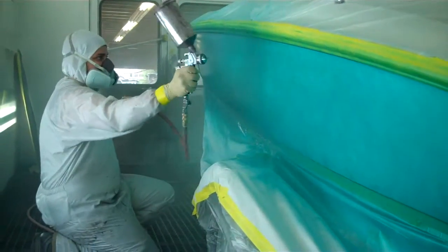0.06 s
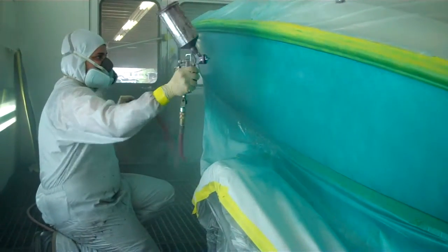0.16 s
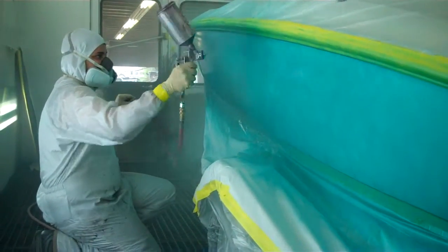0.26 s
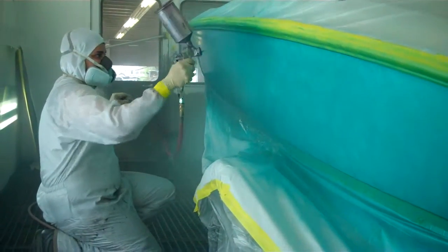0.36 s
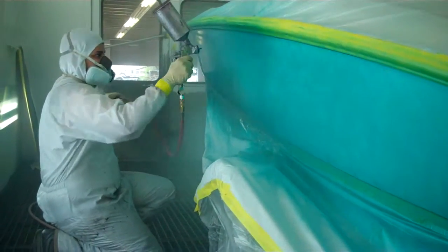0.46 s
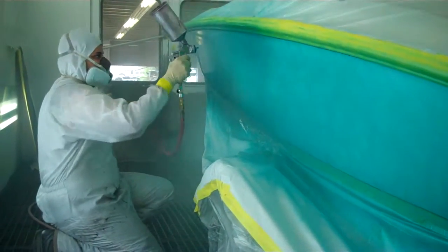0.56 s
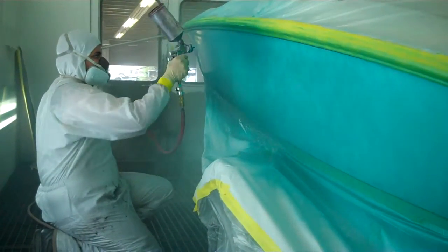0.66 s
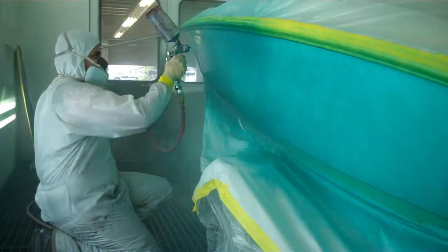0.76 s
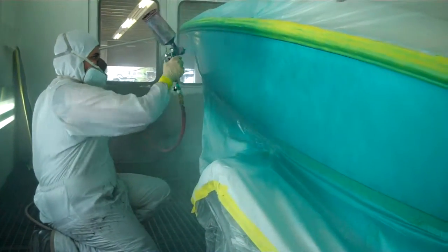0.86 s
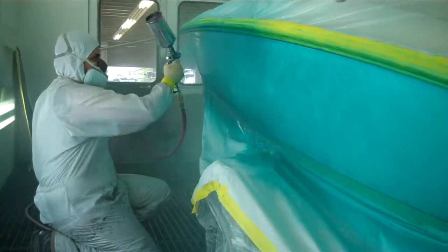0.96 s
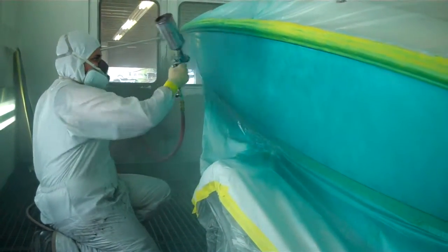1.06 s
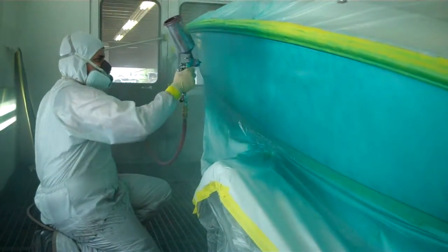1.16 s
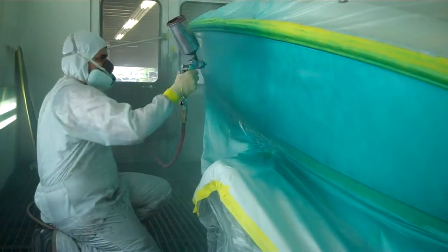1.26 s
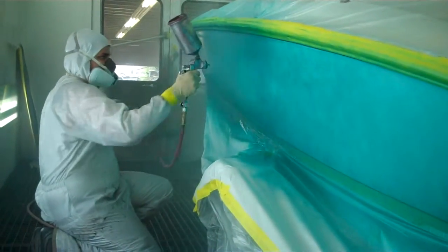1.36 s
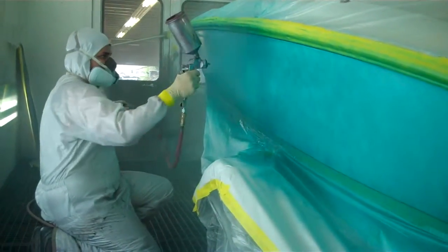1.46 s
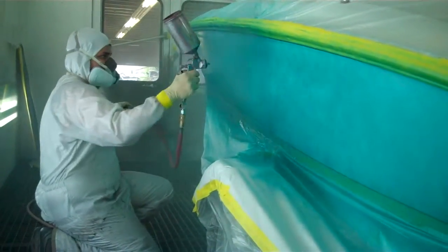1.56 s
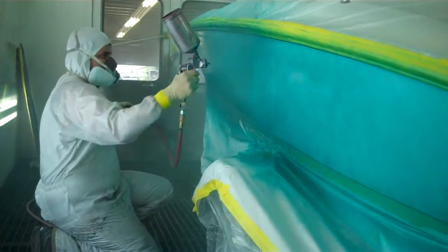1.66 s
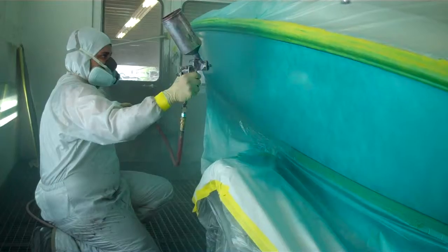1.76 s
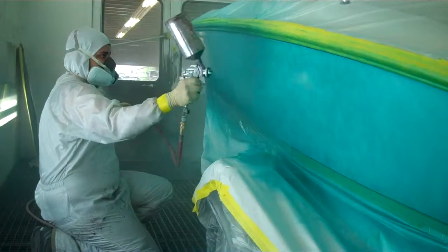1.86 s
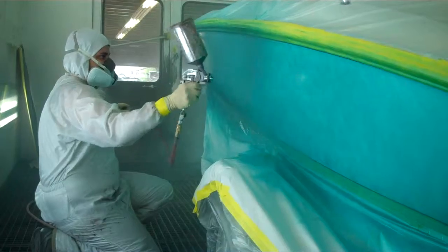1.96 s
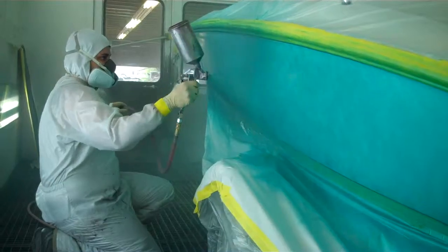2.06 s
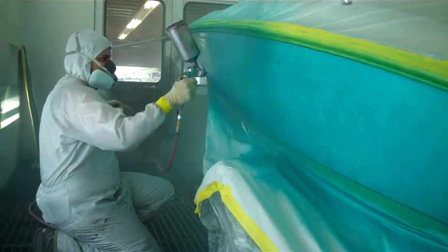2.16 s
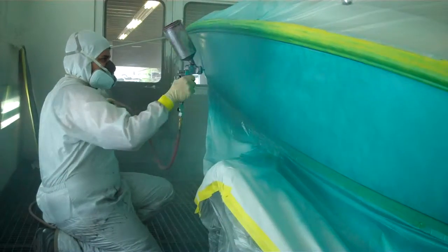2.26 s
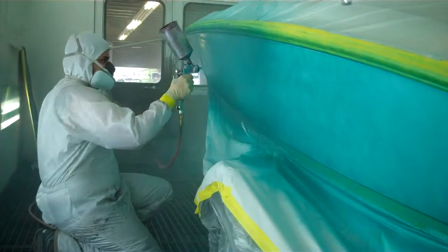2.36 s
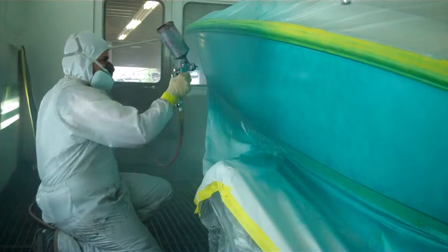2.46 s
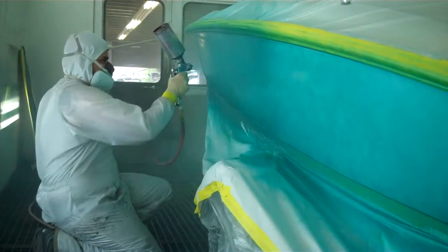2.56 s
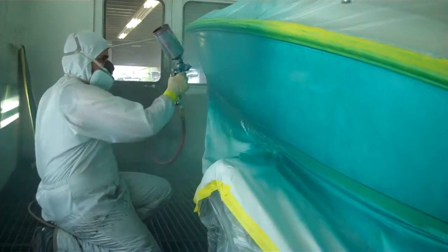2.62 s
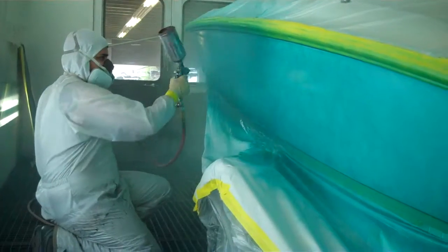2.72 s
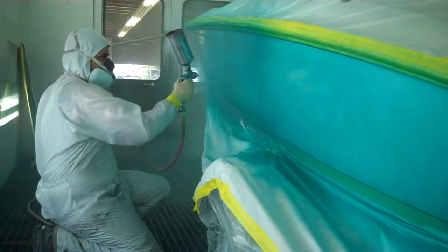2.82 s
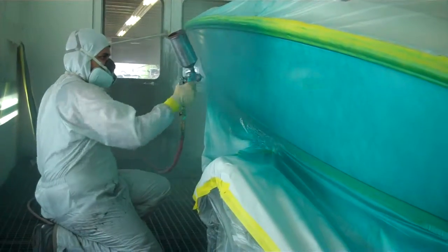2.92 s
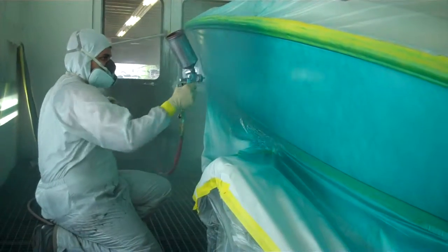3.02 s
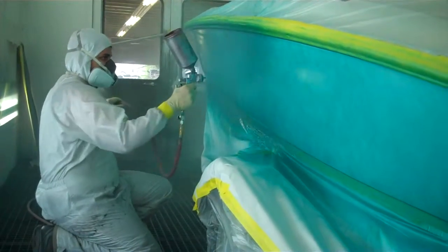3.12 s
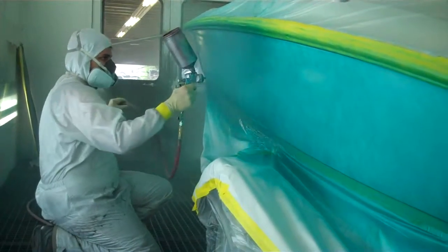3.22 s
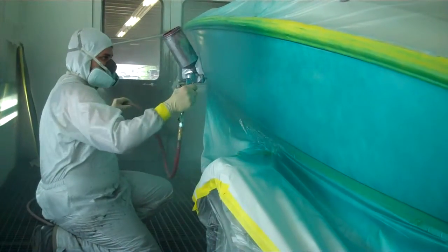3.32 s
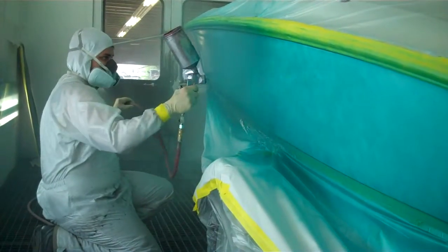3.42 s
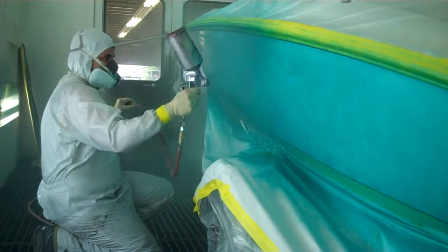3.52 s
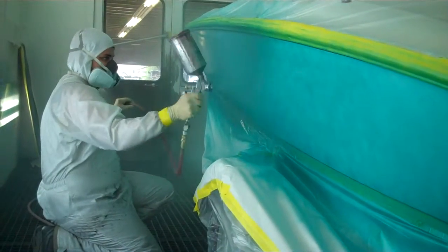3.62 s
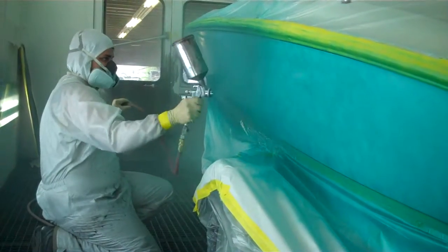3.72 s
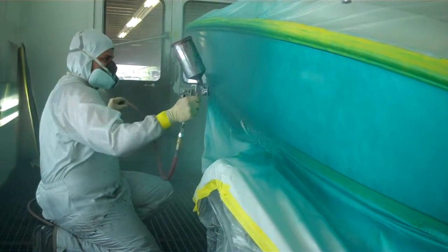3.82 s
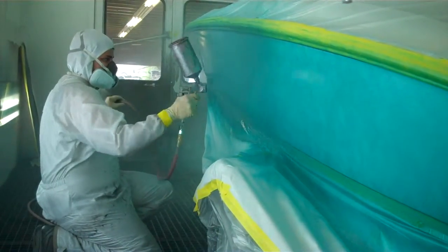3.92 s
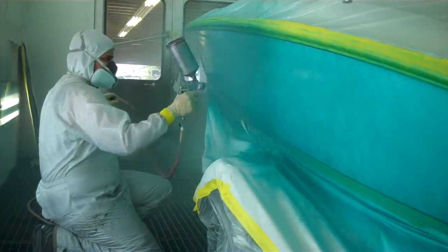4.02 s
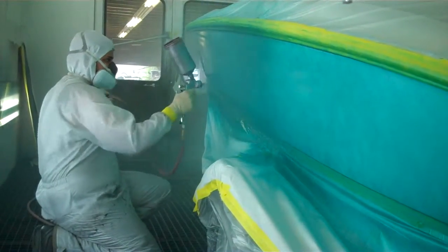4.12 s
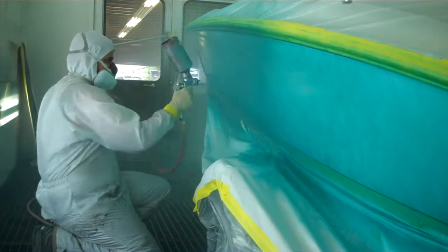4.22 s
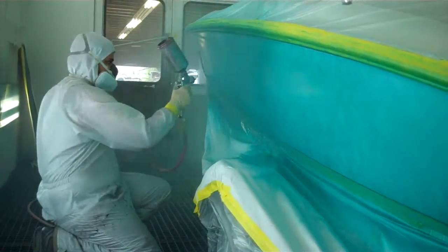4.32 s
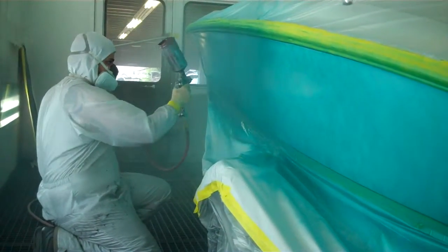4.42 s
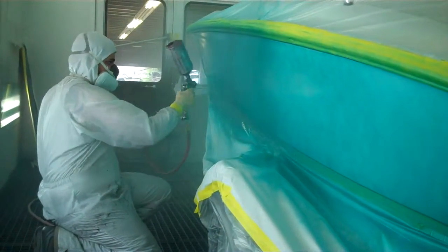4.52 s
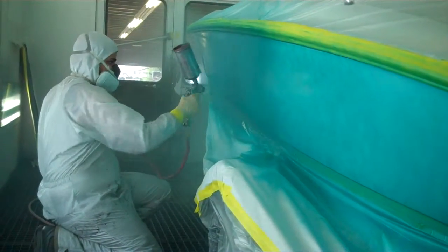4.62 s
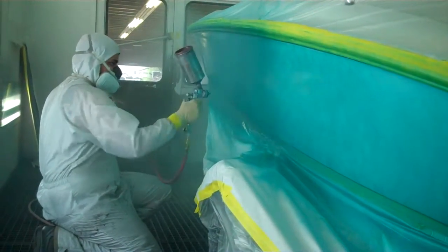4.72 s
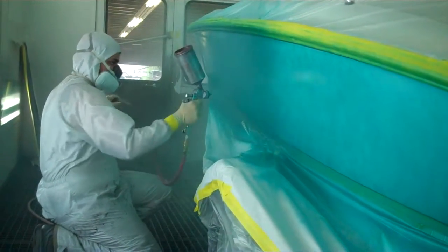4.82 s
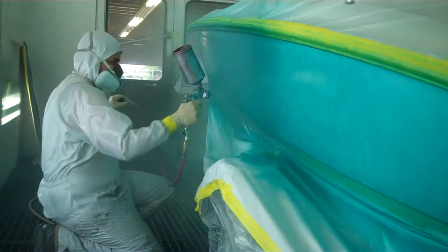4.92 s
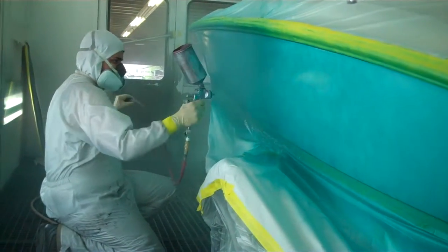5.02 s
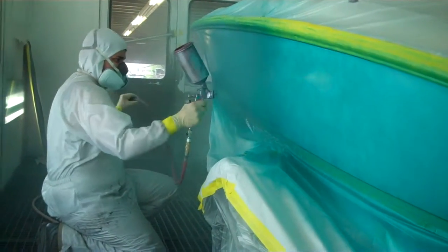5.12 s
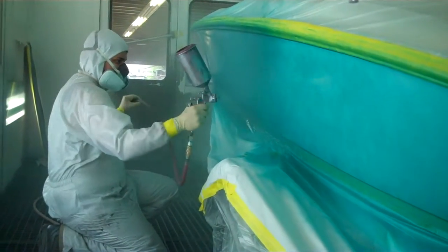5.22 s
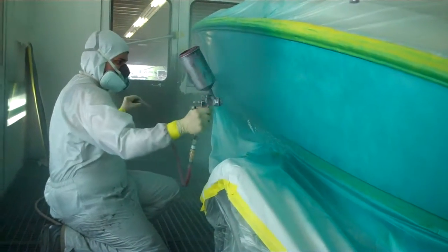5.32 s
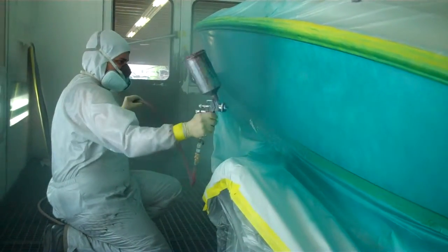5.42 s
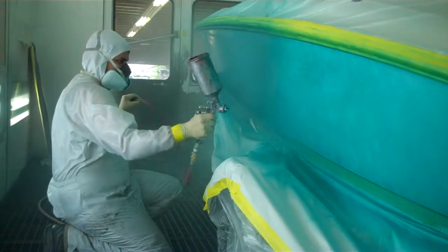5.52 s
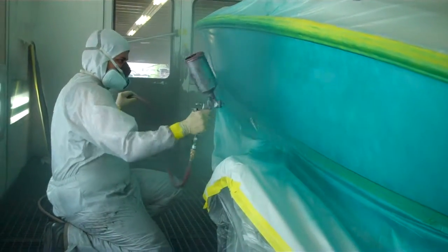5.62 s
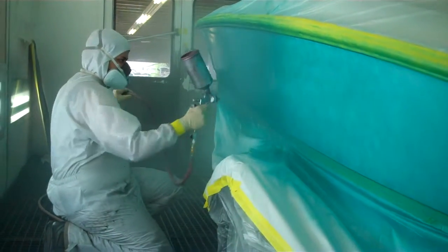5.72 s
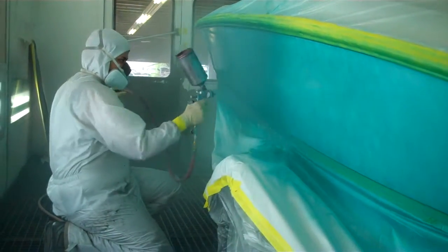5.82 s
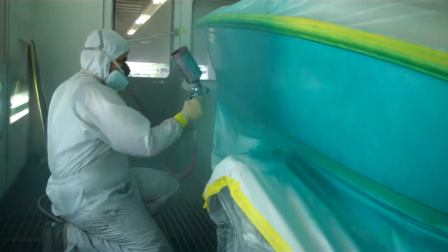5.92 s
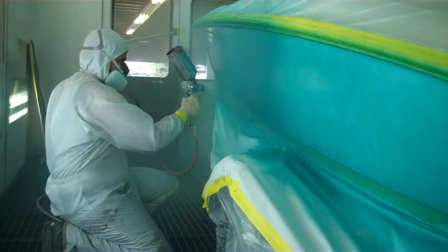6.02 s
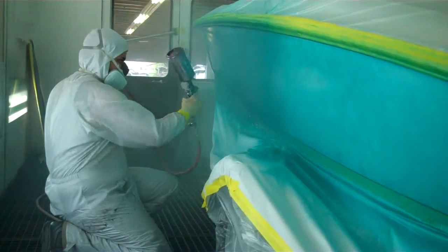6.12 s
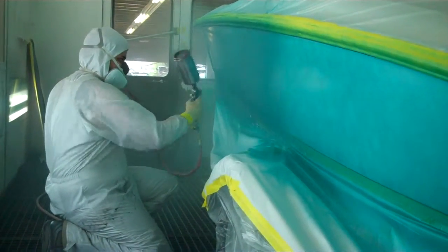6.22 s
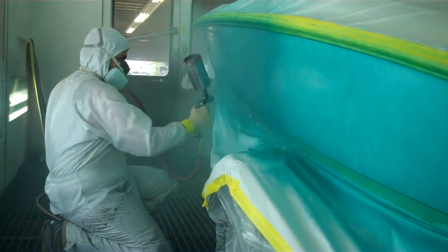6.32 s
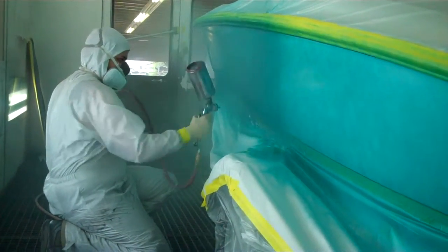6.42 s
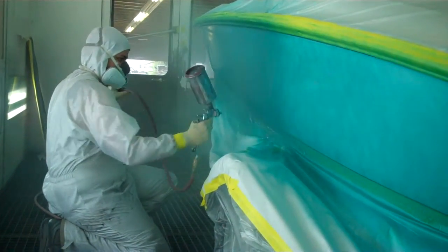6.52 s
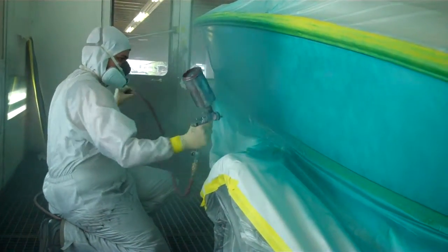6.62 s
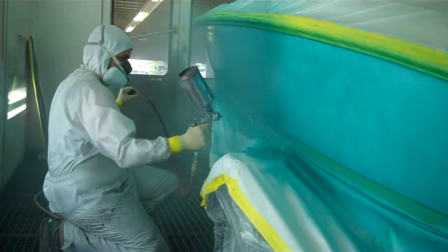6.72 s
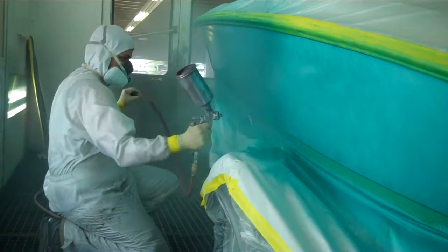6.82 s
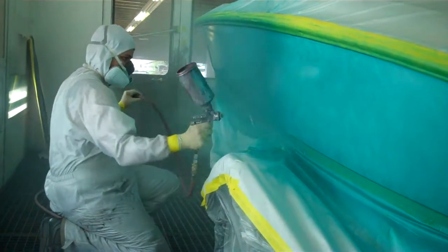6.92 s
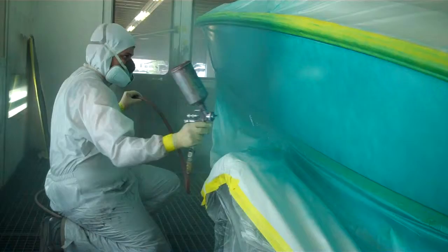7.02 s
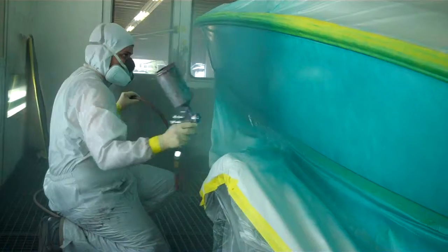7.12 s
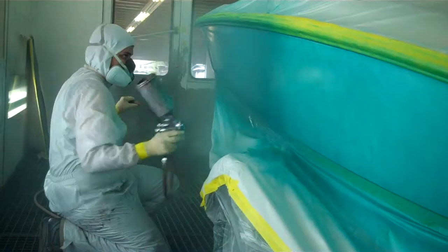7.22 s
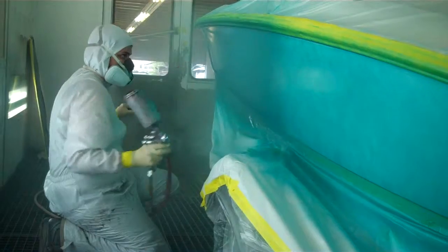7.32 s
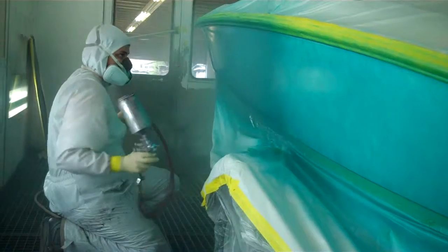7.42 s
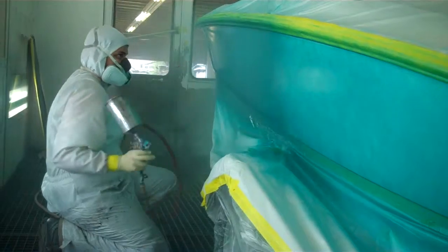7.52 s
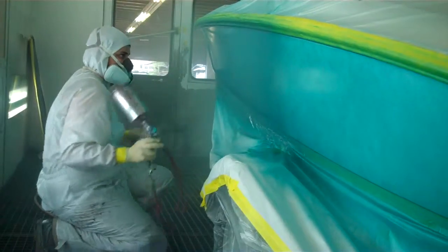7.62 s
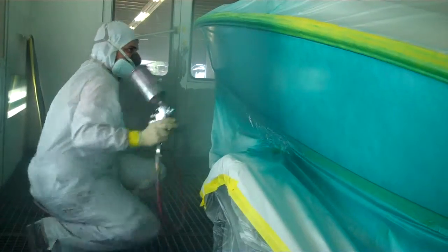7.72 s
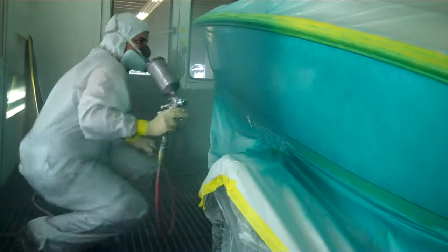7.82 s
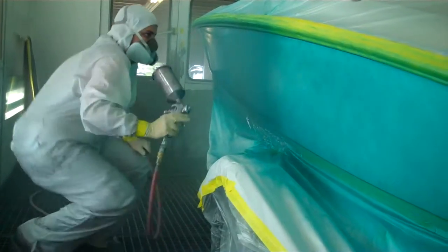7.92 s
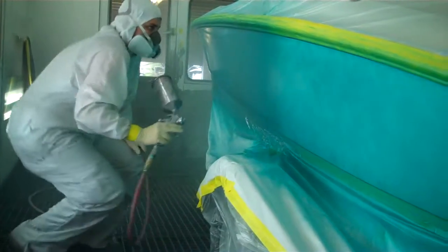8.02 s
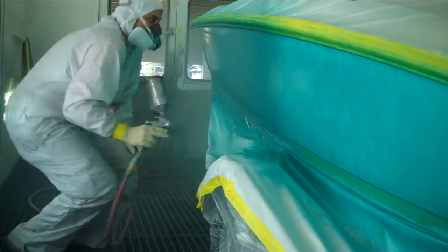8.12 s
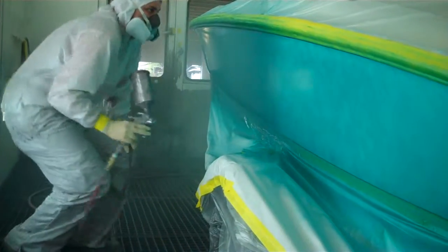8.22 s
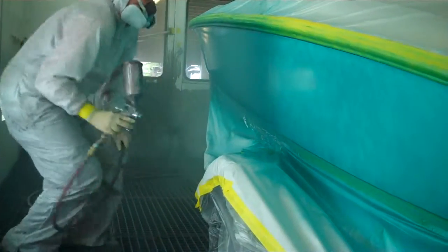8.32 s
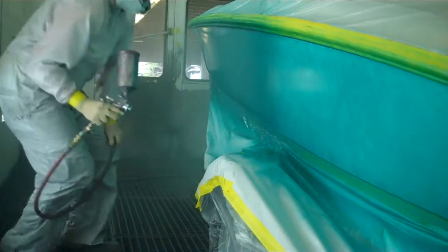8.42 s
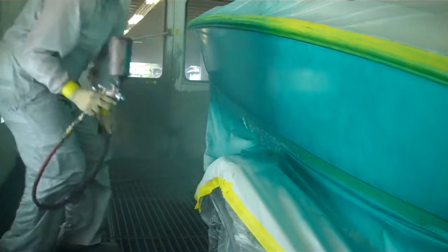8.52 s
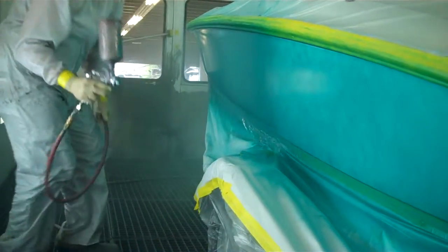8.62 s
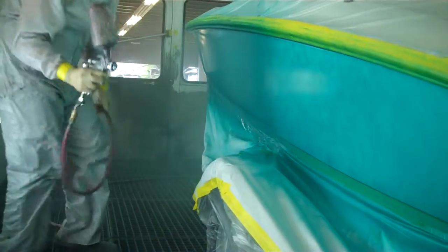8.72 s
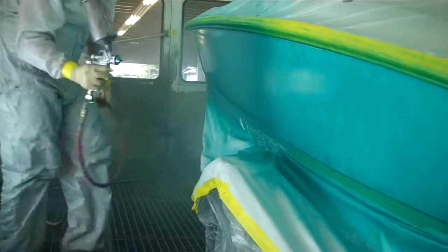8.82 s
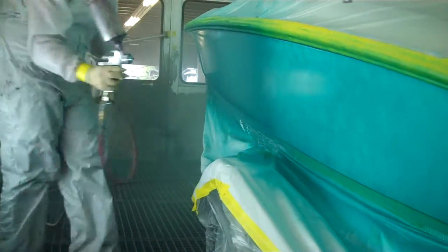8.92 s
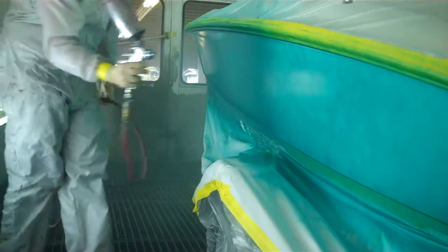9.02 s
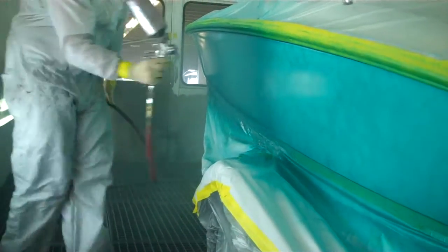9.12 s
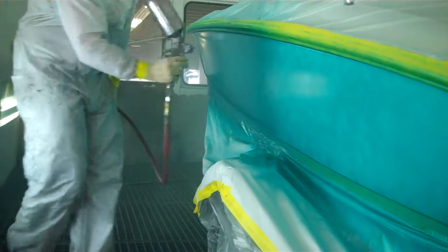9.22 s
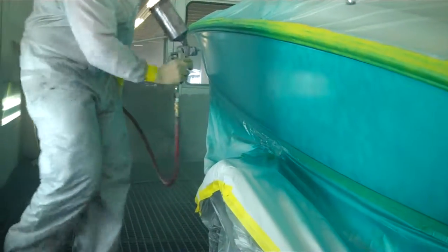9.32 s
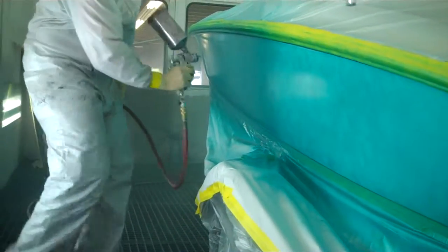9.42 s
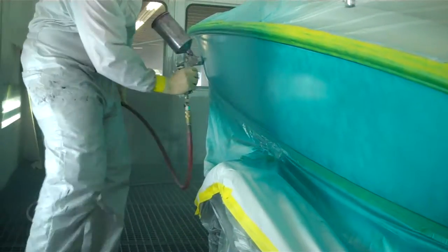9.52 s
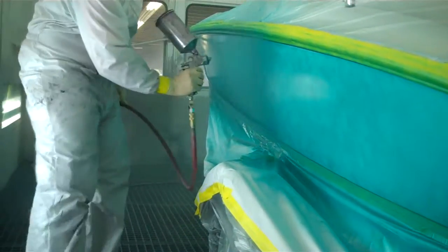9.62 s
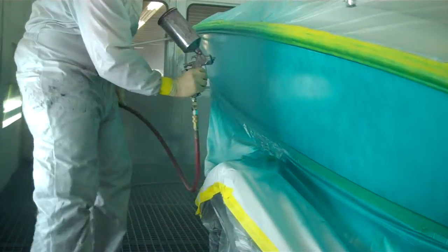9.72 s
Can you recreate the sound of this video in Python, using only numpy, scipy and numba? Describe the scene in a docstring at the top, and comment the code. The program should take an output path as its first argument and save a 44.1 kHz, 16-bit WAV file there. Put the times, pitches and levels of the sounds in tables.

```python
"""From the start a paint gun's turbulent jet hisses along a hull in a spray booth. Behind it extractor fans
hum in the ducts, air rushes through the filters and a belt chirrs once a turn. At 7.2 s the trigger is
released; the recorder's gain, a drawn curve, lifts the booth noise. At 8.8 s a fresh pull brings a surge
of stored air and the gain ducks that noise. Two close microphone ports, each with its own cavity ring,
hear it all. The right one crackles at both trigger moves, then pops until 9.3 s."""
import sys
import numpy as np
from scipy import signal
from scipy.fft import rfft, irfft
from scipy.io import wavfile
from scipy.ndimage import uniform_filter1d, map_coordinates
from numba import njit

SR = 44100
rng = np.random.default_rng(int(sys.argv[2]) if len(sys.argv) > 2 else 0)


def to_wav(s):
    """Save 16-bit WAV."""
    ch = np.atleast_2d(s).T  # columns
    pcm = np.round(np.clip(ch, -1, 1) * 32767)  # PCM
    wavfile.write(sys.argv[1], SR, pcm.astype(np.int16))


N = 430416
T, F = np.arange(N) / SR, np.arange(N // 2 + 1) * SR / N + 1e-3

# jet along the strokes: t/s, hiss level/dB, relative hull splash/dB
JET_LEVELS = [(0, -18.5, 2), (.35, -19, 1), (.75, -21, 3), (.95, -19.5, 3), (1.1, -19.5, 2.5),
              (1.43, -17.5, 2.5), (1.75, -18.5, 1.5), (2.05, -19.5, 1), (2.35, -21.5, 3.5),
              (2.62, -18.5, 1), (2.82, -20.5, 1.5), (2.98, -17.5, 3.5), (3.4, -17.5, 0), (3.75, -18, 1.5),
              (4.05, -20, 2.5), (4.4, -19.5, 3), (4.8, -17.5, 1.5), (5.07, -18, 2.5), (5.35, -18.5, 4),
              (5.61, -18.5, 0), (5.78, -21, 1), (6.05, -21, 2), (6.4, -19, 4.5), (6.8, -18, 3),
              (7.0, -18, 0), (8.94, -22.5, -2.5), (9.1, -22.5, 1), (9.32, -22.5, -5.5), (9.47, -19.5, -4.5),
              (9.62, -21.5, -2), (9.76, -19, 2.5)]
# jet noise: f/Hz, relative density/dB
JET_SPECTRUM = [(300, -37), (700, -17.5), (1500, -9), (2200, -6), (3000, -5), (4000, -1.5), (5000, -0.36),
                (6500, 2), (9000, 1.7), (12000, -1), (14200, -1.5)]
# gun nearing and leaving the hull: t/s, extra echo path/cm, echo gain/1
HULL_ECHO = [(0, 8, .1), (.2, 10, .12), (.55, 9, .2), (.9, 6.5, .1), (1.1, 7, .1), (1.38, 5.2, .33),
             (1.75, 8.8, .22), (2.05, 11, .1), (2.3, 8, .22), (2.62, 6.8, .24), (2.85, 7.3, .14),
             (3.1, 6.2, .22), (3.45, 8.8, .25), (3.85, 10.5, .22), (4.1, 8.5, .36), (4.4, 7, .3),
             (4.62, 7, .26), (4.85, 5.3, .36), (5.05, 6, .3), (5.3, 9, .3), (5.55, 10, .24),
             (5.75, 9.5, .1), (6, 7, .15), (6.25, 6.7, .12), (6.5, 6, .08), (7, 9, .25), (7.2, 10.5, .2),
             (8.9, 8.7, .12), (9.76, 9.8, .14)]
# crackle at trigger moves: t/s, length/s, level/dB
CRACKLE_BURSTS = [(7.203, .017, -1), (8.8334, .022, 2.5)]
# lone pops: t/s, level/dB
LONE_POPS = [(8.864, -3), (8.879, -7.5), (8.908, -18), (8.926, -12), (8.979, -16), (8.985, -15),
             (8.991, -15), (9.015, -14), (9.036, -10), (9.039, -9), (9.106, -9.5), (9.154, -15),
             (9.182, -8), (9.196, -9), (9.208, -10), (9.234, -8.5), (9.266, -14)]
# heard level of hum and rush; wavers while spraying, then recorder gain ducks and recovers
# around the trigger moves: t/s, hum gain/dB, rush gain/dB
HEARD_GAINS = [(0, -3.5, -9.5), (1.3, -2.5, -5), (2.4, -4.5, -7), (3.3, -1.5, -1.5), (3.95, -6.5, -10),
               (4.5, -1.5, -1), (5.6, -4, -6), (7.15, -3.5, -1), (7.25, -6, -13), (7.38, -1, -4),
               (7.6, -2.5, 5), (7.85, 0, 5.3), (8.3, 1.5, 4.5), (8.82, -0.5, 5.5), (8.87, -9.5, -16),
               (9.3, -9.5, -10.5), (9.76, -7, -5)]
# extractor air noise: f/Hz, relative density/dB
AIR_SPECTRUM = [(25, -28), (35, -26), (65, -24), (100, -21.5), (140, -20), (200, -13.5), (290, -9.5),
                (400, -15), (455, -21.5), (680, -18), (900, -27), (1590, -30.5), (3600, -35.5), (7860, -41),
                (9800, -47), (14200, -53)]
# duct resonances: f/Hz, half-width/Hz, base level/dB
DUCT_MODES = [(45.8, 1.21, -55), (87.5, 7.4, -45.5), (108.5, 5.9, -55.5), (240, 6.1, -43),
              (273.5, 21, -44.5), (319, 12, -43.5), (378, 24, -43.5), (524, 32, -45), (1047, 23, -51.5)]
# cavity ring of each port: f/Hz, gain/dB
LEFT_RING = [(200, -0.5), (1500, -1), (4000, -1.5), (6500, 2), (7200, 6), (8000, 11.5), (9000, 4.5),
             (10500, -0.5), (12500, -1), (14200, -2)]
RIGHT_RING = [(200, 0.5), (1500, -0.5), (4000, -1.5), (5200, 4), (6300, 8), (7500, 1), (9000, -5.5),
              (11000, -10.5), (14500, -24.5)]
# likeness of the ports: f/Hz, correlation/1
PORT_CORRELATION = [(60, 0.92), (130, 0.98), (290, 0.98), (630, 0.9), (1370, 0.72), (2990, 0.57),
                    (6530, 0.23), (14300, 0)]

RELEASE_S, PULL_S, SURGE_S = 7.222, 8.76, 8.838


def gun(flutter_db=.5):
    """Paint gun: trigger-gated jet, heard straight and off the hull."""
    hiss_db, splash_db = curves(JET_LEVELS)
    path_cm, echo_gain = curves(HULL_ECHO)
    trigger_db = trigger()
    direct = jet(splash_db, brightness(path_cm, trigger_db))
    return hull_comb(direct, path_cm, echo_gain) * undb(hiss_db + trigger_db + flutter_db * walk(60))


def jet(splash_db, tilt_db, flicker_db=1.04):
    """Turbulent hiss in five bands, the lowest carrying the splash; the shear layer flutters."""
    hiss = noise(undb(over_hz(JET_SPECTRUM)))
    hiss /= np.std(hiss.mean(axis=0))
    bands = split(hiss, [above(hz, order=8) for hz in (2500, 4500, 7000, 10000)])
    gains_db = [splash_db] + [tilt_db * (hz - 8000) / 6000 for hz in (3500, 5700, 8500, 12000)]
    return sum(band * undb(db + flicker_db * np.array([walk(9), walk(8)]))
               for band, db in zip(bands, gains_db))


def brightness(path_cm, trigger_db, db_per_cm=.5, db_per_s=-.16, fresh_db=5.5, fresh_until_s=9.62):
    """Jet tilt in dB per 6 kHz: follows the echo path, dulls with time, lifts on the fresh pull."""
    fresh = (T > PULL_S) * np.clip((fresh_until_s - T) / .081 + 1, 0, 1)
    surge_tilt_db = .16 * np.maximum(trigger_db, 0)  # the surge is sharper than the steady jet
    return -.2 + db_per_cm * (path_cm - 8) + db_per_s * T + fresh_db * fresh + surge_tilt_db


def trigger(close_s=.011, drop_db=12, tail_db_per_s=147, leak_db=-46, open_s=.055, surge_db=10):
    """Jet gain in dB: the valve shuts into the booth's short tail and a leak, then opens with a surge."""
    since_s = T - RELEASE_S
    shut_db = -drop_db * np.clip(since_s / close_s, 0, 1)
    shut_db -= tail_db_per_s * np.maximum(since_s - close_s, 0)
    opened = np.clip((T - PULL_S) / open_s, 0, 1)
    valve_db = 20 * np.log10(undb(shut_db) + opened + 1e-9)
    rise = np.exp(-((T - SURGE_S) / .023) ** 4)
    fall = np.exp(-np.abs(T - SURGE_S) / .02)
    return np.maximum(valve_db, leak_db) + surge_db * np.where(T < SURGE_S, rise, fall)


def hull_comb(direct, path_cm, echo_gain, top_hz=11000, sound_cm_per_s=34300):
    """The wet hull returns a late, duller copy; the comb glides with each stroke."""
    dull, _ = split(direct, [above(top_hz, order=6)])
    late = np.arange(N) - path_cm / sound_cm_per_s * SR
    echo = np.array([map_coordinates(x, [late], order=3) for x in dull])
    return (direct + echo_gain * echo) / np.sqrt(1 + echo_gain ** 2)


def crackle(left_db=-18, push_s=7e-5, ragged=.46, tail_s=.0029, scatter_db=5, fade_db=6, counts=(5, 10)):
    """Port pops, mostly right: each a one-sided push of its own width with a ragged tail."""
    events = list(LONE_POPS)
    for (start_s, length_s, db), count in zip(CRACKLE_BURSTS, counts):
        jitter, weakness = rng.random((count, 2)).T
        index = np.arange(count)
        times_s = start_s + length_s * (index + jitter) / count
        events += zip(times_s, db - scatter_db * weakness - fade_db * index / count)
    t = np.arange(SR // 150) / SR - .001  # zero at the push's peak
    draws = rng.standard_normal((len(events), len(t) + 1))
    widths_s = push_s * undb(1.5 * draws[:, :1])
    pushes = np.exp(-.5 * (t / widths_s) ** 2)
    tails = signal.lfilter([.3], [1, -.7], draws[:, 1:]) * np.exp(-np.abs(t) / tail_s)
    pops = signal.sosfilt(signal.butter(1, 300, "highpass", fs=SR, output="sos"), pushes + ragged * tails)
    out = np.zeros(N)
    for (start_s, db), pop in zip(events, pops):
        i = int(start_s * SR)
        out[i:i + len(t)] += pop * undb(db)
    return out * undb([[left_db], [0]])


def booth():
    """Fan rumble, duct resonances, blade tone, belt and the filters' rush, whose treble swishes."""
    hum_db, rush_db = curves(HEARD_GAINS)
    blade = fan_blades()
    air = level(noise(undb(over_hz(AIR_SPECTRUM))), db=-32.5)
    ducts = sum(level(noise(peak(hz, width_hz)), db) for hz, width_hz, db in DUCT_MODES)
    crossovers = [above(182, order=4), above(680, order=4), above(4200, order=8), above(7300, order=8)]
    rumble, hum, rush, swish, fizz = split(air + ducts, crossovers)
    rush = rush * undb(walk(6.2)) + swish * undb(2.3 * walk(8)) + fizz * undb(2.5 * walk(3.5))
    return rumble * undb(.31 * hum_db) + (hum + blade) * undb(hum_db) + (rush + belt()) * undb(rush_db)


def fan_blades(blade_hz=273.5, base_db=-32, pan_db=1.2):
    """Steady blade tone that throbs in the duct."""
    throb = level(irfft(rfft(rng.standard_normal(N)) * peak(hz=3.7, width_hz=2.9), N), db=-11)
    tone = np.sqrt(2) * np.sin(2 * np.pi * blade_hz * T)
    return tone * (1 + throb) * undb([[base_db - pan_db], [base_db + pan_db]])


def belt(turn_s=.315, phase_zero_s=7.77):
    """A breathy squeak and faint octave leap up and glide down once a turn; two guard plates sing."""
    turn_rad = 2 * np.pi * (T - phase_zero_s) / turn_s
    glide = uniform_filter1d(signal.sawtooth(turn_rad, .3), SR // 20)
    squeak_hz = 2450 + 330 * glide + 60 * walk(30)
    squeak = gliding_noise(squeak_hz, width_hz=620.)
    octave = gliding_noise(2 * squeak_hz, width_hz=1240.)
    low_plate = noise(peak(hz=2234, width_hz=18)) * undb(3.1 * np.cos(turn_rad + 1.8))
    high_plate = noise(peak(hz=2942, width_hz=130)) * undb(3.1 * np.cos(turn_rad + 2.0))
    octave *= undb(2.3 * walk(16))
    return level(squeak, -42) + level(octave, -48) + level(low_plate, -47.5) + level(high_plate, -51.5)


def noise(gain):
    """Coloured noise at the two ports: alike in the bass, unrelated in the treble."""
    alike = np.clip(over_hz(PORT_CORRELATION), 0, 1)
    mid, side = rfft(rng.standard_normal((2, N)), axis=1) * np.sqrt([1 + alike, 1 - alike])
    ring = undb([over_hz(LEFT_RING), over_hz(RIGHT_RING)])
    return irfft(np.array([mid + side, mid - side]) * ring * gain, N, axis=1)


def gliding_noise(hz, width_hz):
    return np.array([sweep(sweep(x, hz, width_hz), hz, width_hz) for x in noise(1)])


@njit
def sweep(x, hz, width_hz):
    """State-variable band-pass, moving centre."""
    y, band_state, low_state = np.empty(len(x)), 0., 0.
    for i in range(len(x)):
        g, damping = np.tan(np.pi * hz[i] / SR), width_hz / hz[i]
        band = (band_state + g * (x[i] - low_state)) / (1 + g * (g + damping))
        band_state = 2 * band - band_state
        low_state += 2 * g * band
        y[i] = damping * band
    return y


def walk(rate_hz):
    """Smoothed random steps, spread near 1."""
    hold = int(SR / rate_hz)
    steps = np.repeat(rng.standard_normal(N // hold + 1), hold)
    return 1.13 * uniform_filter1d(uniform_filter1d(steps, hold), hold)[:N]


def split(x, crossovers):
    """Bands that sum to x, low to high."""
    shares = -np.diff([np.ones_like(F), *crossovers, np.zeros_like(F)], axis=0)
    spectrum = rfft(x, axis=1)
    return [irfft(spectrum * share, N, axis=1) for share in shares]


def above(hz, order):
    """High-pass gain per bin."""
    return 1 / (1 + (hz / F) ** order)


def peak(hz, width_hz):
    """Resonance gain per bin."""
    return 1 / (1 + ((F - hz) / width_hz) ** 2)


def curves(rows):
    """Time table, per sample."""
    times_s, *columns = np.transpose(rows)
    return [np.interp(T, times_s, column) for column in columns]


def over_hz(rows):
    """Frequency table, per bin."""
    hz, values = np.transpose(rows)
    return np.interp(np.log(F), np.log(hz), values)


def level(x, db):
    return x * undb(db) / np.sqrt(np.mean(x ** 2))


def undb(db):
    return 10 ** (np.asarray(db) / 20)


def scene():
    return gun() + booth() + crackle()


def record(dry, top_hz=14190):
    """Clip at full scale, then a steep low-pass."""
    return signal.sosfilt(signal.ellip(18, .2, 90, top_hz, fs=SR, output="sos"), np.clip(dry, -1, 1))


dry = scene()
out = record(dry)
to_wav(out)
```